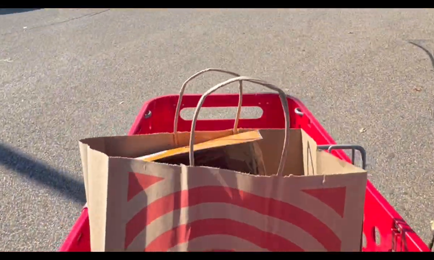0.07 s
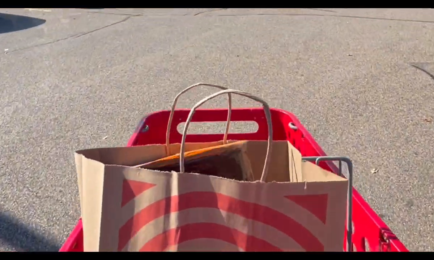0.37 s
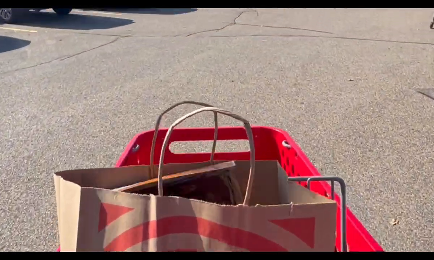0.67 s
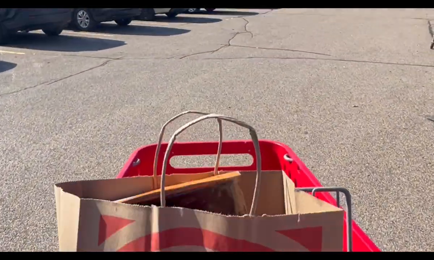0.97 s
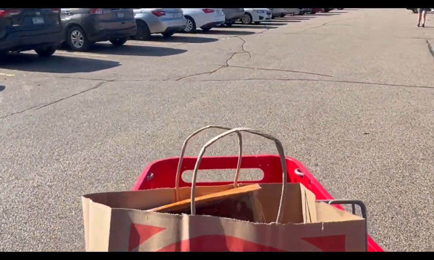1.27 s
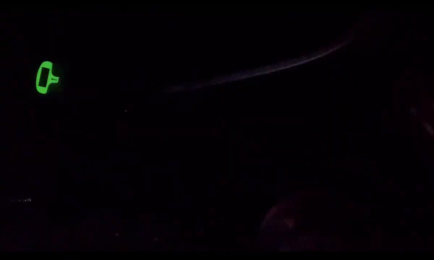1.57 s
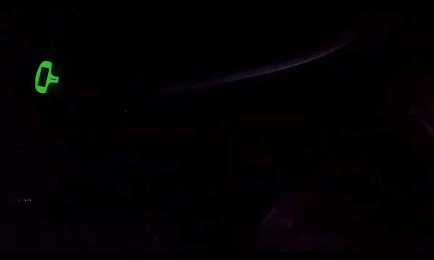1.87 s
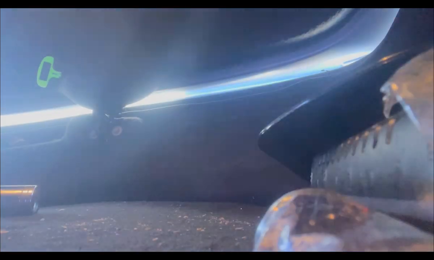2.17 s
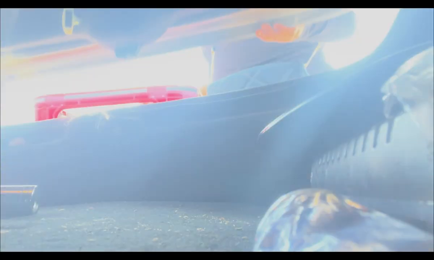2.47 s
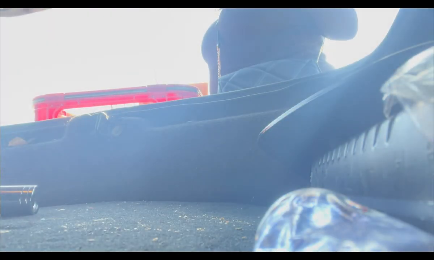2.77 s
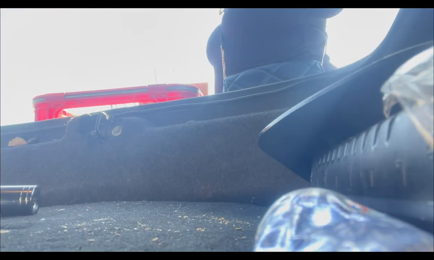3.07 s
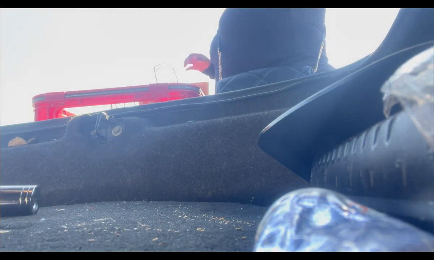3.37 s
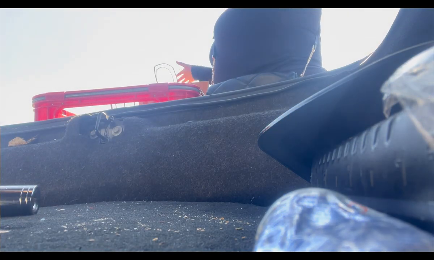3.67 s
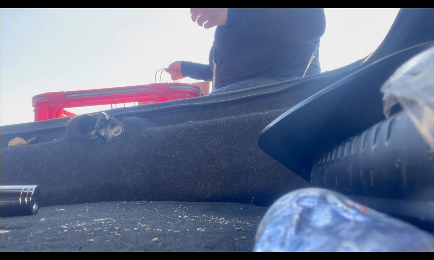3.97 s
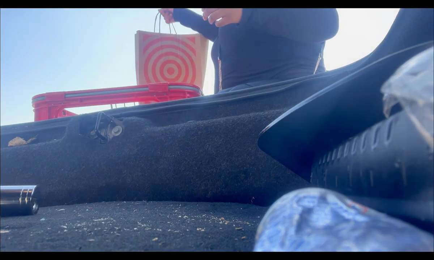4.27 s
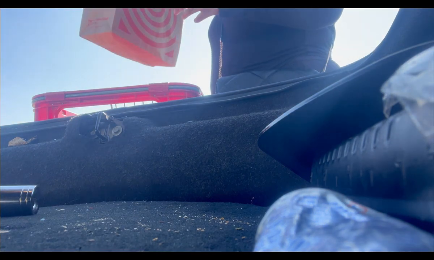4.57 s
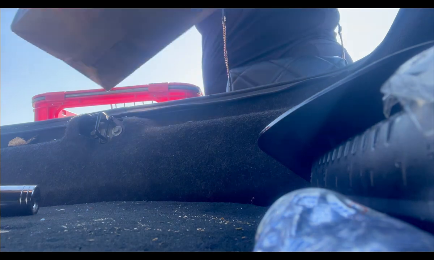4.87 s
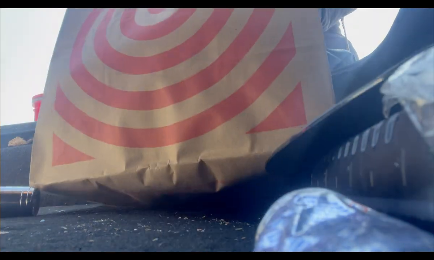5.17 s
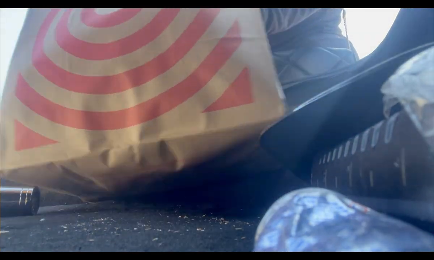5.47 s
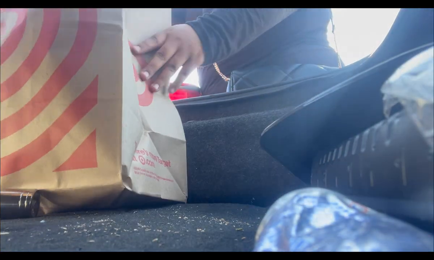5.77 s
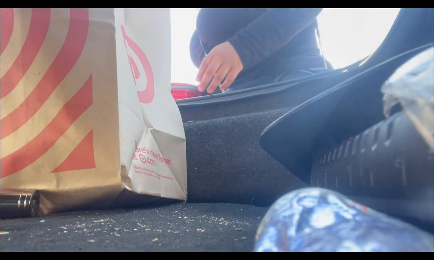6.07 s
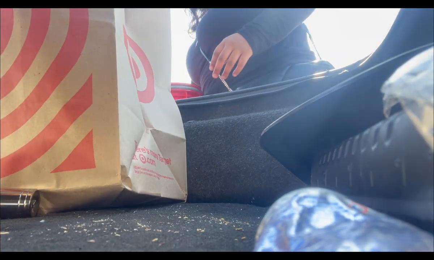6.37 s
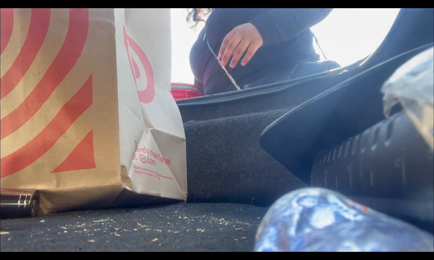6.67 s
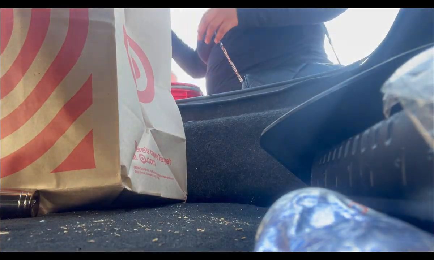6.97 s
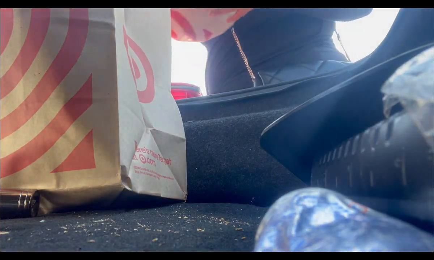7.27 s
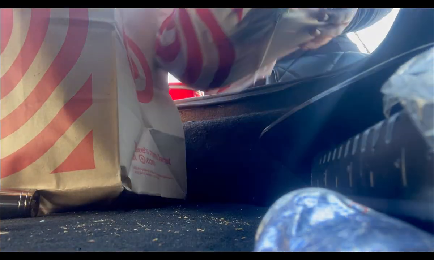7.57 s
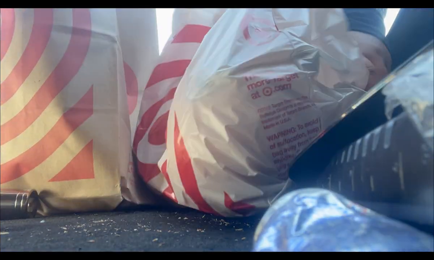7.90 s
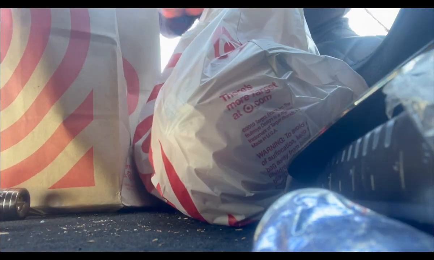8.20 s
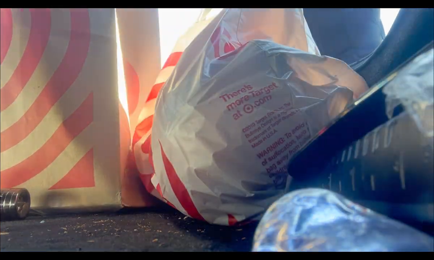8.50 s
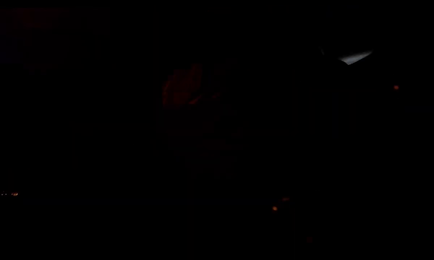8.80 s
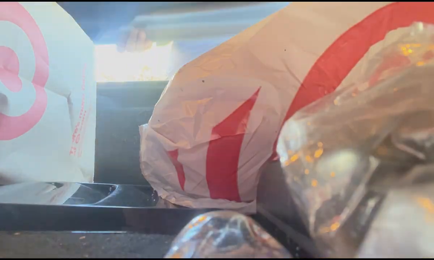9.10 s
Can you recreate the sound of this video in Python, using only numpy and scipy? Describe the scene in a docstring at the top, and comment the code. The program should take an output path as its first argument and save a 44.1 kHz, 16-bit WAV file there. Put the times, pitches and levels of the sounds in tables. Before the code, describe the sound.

A plastic shopping cart rattles close by over asphalt, wheels rumbling, basket clacking and steel fittings clinking, until an abrupt cut at 1.6 seconds. After near silence, heard from inside a car trunk, the latch clunks at 1.9 seconds and the lid springs open with a deep boom. Faint outdoor rumble and distant traffic come in. A tiny squeak at 2.6 seconds precedes a soft engine drone that fades by about 3.6. A paper bag rustles lightly at 4 seconds, its handle creaking, then crackles, knocks and thumps down close from 5 to 6. A thin plastic bag crinkles faintly from 6.5 seconds, growing loud and landing around 7.8 with thumps and clicks of hard goods. Small crinkles follow. At 8.8 seconds the lid slams with a heavy boom, the loudest sound. The last moment cuts to quiet rumble and thin hiss inside the car.

```python
"""A parking lot, in three scenes joined by hard cuts. First a plastic shopping cart rattles over asphalt:
wheels rumble, the basket clacks, steel fittings click. Then, from inside a car's trunk, the latch lets
go and the lid springs open on far traffic; a paper bag and a plastic bag rustle in and thump down, and
the lid slams. Last comes a moment in the quiet car. Blows are noise bursts and damped modes; rolling
and rustling are noise broken into tiny grains."""
import sys
import numpy as np
from scipy import signal
from scipy.fft import rfft, irfft, next_fast_len
from scipy.io import wavfile
from scipy.ndimage import uniform_filter1d, map_coordinates

SR = 44100
rng = np.random.default_rng(int(sys.argv[2]) if len(sys.argv) > 2 else 0)


def master_out(mix):
    """Clip the mix to full scale and print it as 16-bit PCM to the path in sys.argv[1]."""
    frames = np.transpose(np.atleast_2d(mix))
    ceiling = np.clip(frames, -1, 1)
    pcm = np.round(ceiling * 32767).astype(np.int16)
    wavfile.write(sys.argv[1], SR, pcm)


N = 411894
T = np.arange(N) / SR
CART_ENDS, TRUNK_STARTS, TRUNK_ENDS, CAR_STARTS = 1.573, 1.623, 9.035, 9.059  # seconds


# EQ of the wheels and the basket. Each row: frequency in Hz, level in dB.
WHEEL_EQ = [(12, -45), (20, -26), (47, -2.5), (75, 0.5), (103, -1), (230, -13), (250, -11.5), (320, -30),
            (550, -120)]
BASKET_EQ = [(110, -29), (180, 3), (232, -9.5), (274, -4.5), (313, 2.5), (428, 1.5), (472, -2.5), (538, 1),
             (685, -8.5), (831, -5.5), (1080, -2.5), (1390, -9), (1700, -8), (2200, -16), (3200, -20),
             (4160, -36), (7040, -120)]
# Gritty crunch, with a narrow filter dip near 10 kHz. Each row: frequency in Hz, level in dB.
NOTCHED_CRUNCH_EQ = [(1470, -24), (2500, -5.5), (4020, 0.5), (6500, -2.5), (9220, -2.5), (10200, -24),
                     (11600, -7.5), (13700, -30), (16000, -12.5)]
# Crunches over loose grit. Each row: start in seconds, hold in seconds, level in dB.
CRUNCHES = [(0.043, 0.006, -46), (0.946, 0.014, -43.5), (1.412, 0.032, -40.5)]

def rolling(shake_db):
    """Hard wheels rumble on coarse asphalt, rattle the basket and crunch grit, all riding the shake."""
    wheel_gain = amp(-35.5 + 0.36 * shake_db + 0.61 * wobble(18))
    wheels = wheel_gain * noise(WHEEL_EQ, grains(rate=690, spread_db=2.5, life=0.026))
    rattle = noise(BASKET_EQ, grains(rate=370, spread_db=4, life=0.021))
    rattle = amp(-38.5 + 0.71 * shake_db) * patchy(rattle, depth_db=1.5, bands=4, frames=8)
    crunch, = swells(CRUNCHES, attack=.05, release=.1)
    grit = noise(NOTCHED_CRUNCH_EQ, grains(rate=3200, spread_db=5.5, life=0.0026))
    return wheels + rattle + (amp(-55.5 + 0.7 * shake_db) + crunch) * grit


# Bumps in the asphalt. Each row: start in seconds, relative level in dB, pitch in Hz.
JOLTS = [(0.061, -15.5, 1900), (0.099, -25, 2000), (0.229, -21.5, 1500), (0.462, -20.5, 2200),
         (0.482, -21, 2000), (0.546, -24, 1800), (0.573, -23.5, 1490), (0.61, -24, 2500),
         (.780, -23.5, 1900), (0.8109, -23.5, 2500), (0.83, -22.5, 1513), (0.9833, -17, 1500),
         (1.0272, -21, 1600), (1.0634, -15, 1396), (1.128, -33, 1500), (1.437, -20, 1700),
         (1.496, -19, 1300)]
# EQ of a plastic clack. Each row: frequency in Hz, level in dB.
CLACK_EQ = [(200, -28), (500, -6), (1100, 0.5), (1700, -5), (2800, -5.5), (5000, -9), (9000, -24.5)]
# Ring of the basket's walls. Each row: frequency in Hz, level in dB, decay time in seconds.
BASKET_MODES = [(281.5, -2.5, 0.31), (418, -7.5, 0.096), (527.5, -2.5, 0.053), (897, 0, 0.1),
                (1066, 1, 0.067), (1240, -1, 0.046), (1462, -4, 0.064), (1960, -3.5, 0.05),
                (2194, 0.5, 0.036), (2770, -16.5, 0.097)]

def basket_clacks():
    """Each bump makes the plastic basket clack and sets its walls ringing."""
    out = np.zeros((2, N))
    for s, db, hz in JOLTS:
        clack = burst(centred(CLACK_EQ, hz, slope_db=6), t60=0.057, attack=0.0012)
        add(out, s, amp(db - 13.5) * clack + amp(db - 18) * clang(BASKET_MODES))
    return out


def chatter(shake_db, count):
    """Extra rows for CLINKS: faint clicks at random times, louder where the cart shakes harder."""
    place, size, ring_size, pitch = rng.random((count, 4)).T
    s = (np.arange(count) + place) * CART_ENDS / count
    push_db = np.interp(s, T, shake_db)
    click_db = -34.5 + push_db + 5.5 * (2 * size - 1)
    ring_db = -40.5 + push_db + 5.5 * (2 * ring_size - 1)
    return list(zip(s, click_db, ring_db, 4800 + 1800 * pitch))


# Steel clinks. Each row: start in seconds, relative click level in dB, ring level in dB, ring pitch in Hz.
CLINKS = [(0.0295, -31.5, -32, 6400), (0.041, -28.5, -34.5, 5100), (0.1591, -30, -49, 5100),
          (0.3527, -27, -35.5, 5100), (0.391, -33, -39, 5000), (0.410, -32.5, -39, 5000),
          (0.4404, -33, -38.5, 6500), (0.4838, -25, -29.5, 5000), (0.493, -35, -31.5, 5000),
          (0.5746, -27.5, -47.5, 5000), (0.604, -28.5, -38.5, 5800), (0.635, -33.5, -30.5, 5900),
          (0.7138, -36.5, -41, 5000), (0.7799, -29, -44, 5000), (0.8104, -28.5, -25.5, 6400),
          (0.8594, -32.5, -36.5, 5300), (0.9214, -26, -34, 5000), (0.945, -23.5, -31, 5300),
          (0.9821, -26, -31, 5800), (1.0106, -34.5, -35, 5100), (1.0267, -25.5, -34.5, 5300),
          (1.059, -29.5, -32, 6500), (1.0874, -33, -30, 5800), (1.1046, -28.5, -21.5, 6400),
          (1.119, -35.5, -34.5, 6400), (1.138, -26.5, -27.5, 5800), (1.2309, -28, -33.5, 6500),
          (1.3183, -26.5, -25.5, 6500), (1.3492, -30, -28.5, 5800), (1.4099, -25.5, -38, 8000),
          (1.4503, -24.5, -20.5, 6500), (1.4851, -32.5, -26.5, 6400), (1.517, -32, -28, 5000),
          (1.5628, -35.5, -39, 5600)]
# Bright click, with a narrow filter dip near 10 kHz. Each row: frequency in Hz, level in dB.
NOTCHED_CLICK_EQ = [(800, -15.5), (2000, 3), (3500, 8), (6000, 6), (9000, 1), (10300, -13.5), (11800, 1),
                    (14000, -23), (16000, -23)]
# EQ of the steel ring. Each row: frequency in Hz, level in dB.
STEEL_EQ = [(3500, -23), (4400, 1), (5050, 3.5), (5400, -6.5), (5800, -3.5), (6100, -5), (6480, 8.5),
            (7000, -2), (7900, -1), (8600, -17), (12000, -38)]

def steel_fittings(shake_db):
    """Steel fittings click against the plastic walls; the struck wire rings at its own pitch."""
    out = np.zeros((2, N))
    for s, db, ring_db, ring_hz in CLINKS + chatter(shake_db, count=18):
        tick_hz = 3100 * 2 ** rng.normal(0, 1)  # scattered by about an octave
        tick = burst(centred(NOTCHED_CLICK_EQ, tick_hz, slope_db=1.5), t60=0.03, attack=0.00027)
        wire = burst(centred(STEEL_EQ, ring_hz, slope_db=20.5), t60=0.0093, attack=0.00034)
        add(out, s, amp(db - 6) * tick + amp(ring_db) * wire + amp(db - 16) * clang(BASKET_MODES))
    return out


# How hard the asphalt shakes the cart. Each row: time in seconds, level in dB.
SHAKE = [(0.0, -35), (0.078, -40.5), (0.126, -43.5), (0.266, -38.5), (0.376, -42), (0.48, -33.5),
         (0.76, -44), (0.786, -36.5), (0.805, -36.5), (0.83, -32), (0.9, -39), (0.95, -34.5), (1.02, -37.5),
         (1.07, -27), (1.084, -31), (1.316, -40), (1.508, -30), (1.57, -37.5)]
USUAL_SHAKE_DB = -37
# Stereo width outdoors. Each row: frequency in Hz, side level against mid in dB.
OPEN_AIR_WIDTH = [(60, -19), (110, -14.5), (200, -16), (380, -16), (700, -6.5), (1290, -5.5), (2380, -4),
                  (4400, -4), (8120, -5), (15000, 5)]

def cart():
    """The asphalt shakes the whole cart, and hard surfaces close by reflect its treble."""
    shake_db = curves(SHAKE)[0] - USUAL_SHAKE_DB
    out = rolling(shake_db) + basket_clacks() + steel_fittings(shake_db)
    return stereo(near_walls(out, echo_db=-10, reach=0.0043, lowest_hz=1780), OPEN_AIR_WIDTH)


# Hits of lid, latch and seal. Each row: start in seconds, relative thud and knock levels in dB,
# crack level in dB, crack pitch in Hz, crack decay time in seconds.
LID_HITS = [(1.873, -42, -22, -45, 1600, .022), (1.907, -22, -28, -36.5, 2010, 0.12),
            (1.927, -29.5, -28.5, -34, 4370, 0.11), (1.938, -32, -32.5, -39, 4560, 0.041),
            (1.953, -23.5, -28.5, -41, 3800, 0.037), (1.995, -21, -32, -50, 4500, 0.044),
            (2.073, -28, -36, -55.5, 1700, 0.043), (2.32, -62, -48, -53, 4000, 0.021),
            (8.8195, -6, -17, -29, 2350, 0.022), (8.823, -11, -9, -15, 2100, 0.027),
            (8.832, -13.5, -14, -17, 1910, 0.024), (8.848, -0.5, -19.5, -25, 4040, 0.016),
            (8.863, -11.5, -17.5, -37, 4980, 0.055), (8.877, -12, -29, -37, 5500, 0.1),
            (8.891, -13, -19, -26, 6630, 0.078), (8.937, -19.5, -30.5, -38, 6040, 0.094),
            (8.99, -36, -55, -53.5, 4000, 0.092)]
# EQ of the low, mid and top layers of a hit, on lid or bag. Each row: frequency in Hz, level in dB.
THUD_EQ = [(30, -20), (90, 6), (250, -4), (420, -1), (600, -13.5), (1500, -59)]
KNOCK_EQ = [(150, -28.5), (400, 8.5), (900, 1.5), (1800, -7), (2600, -22), (5000, -60)]
CRACK_EQ = [(1000, 5.5), (2500, 0.5), (5500, -4), (9000, -6.5), (11500, -18), (13000, -45.5), (16000, -35)]
# Ring of the lid's panels. Each row: frequency in Hz, level in dB, decay time in seconds.
PANEL_MODES = [(569, 0, 0.12), (614, 4.5, 0.2), (715, 3, 0.22), (789, -1.5, 0.14), (883, 3.5, 0.075),
               (970, 7.5, 0.097), (1045, 4, 0.075), (1330, -13.5, 0.07), (1630, -2, 0.049),
               (1690, -12, 0.051), (2680, -15, .07)]

def lid_hits():
    """The lid knocks free, then later slams and rebounds on its seal; each contact rings its panels."""
    out = np.zeros((2, N))
    for s, thud_db, knock_db, crack_db, crack_hz, t60 in LID_HITS:
        add(out, s, amp(thud_db - 3) * burst(THUD_EQ, t60 * 3.1, attack=0.0028))
        add(out, s, amp(knock_db - 7) * burst(KNOCK_EQ, t60 * 2.13))
        crack = burst(centred(CRACK_EQ, crack_hz, slope_db=5.5), t60, attack=0.00038)
        add(out, s, amp(crack_db) * crack + amp(knock_db - 17.5) * clang(PANEL_MODES))
    return out


# Rubs of the latch and, last, of the seal. Each row: centre in seconds, level in dB, width in seconds.
LATCH_AND_SEAL_RUBS = [(1.868, -32.5, 0.011), (1.876, -24.5, 0.0044), (1.892, -31.5, 0.023),
                       (2.001, -36.5, 0.0054), (2.088, -49, 0.019), (8.818, -19.5, 0.0078)]

def latch_and_seal():
    """The latch rubs as it opens; the lid brushes its seal at the slam."""
    eq = [(150, -5), (400, -2), (560, -1), (640, -2.5), (740, 0), (1000, -5.5), (1300, -16.5),
          (1660, -21.5), (2100, -28), (3000, -27.5), (8000, -38), (13000, -58.5)]
    return rub(LATCH_AND_SEAL_RUBS, eq)


# Booms of the opening and of the slam. Each row: start in seconds, level in dB, attack in seconds.
OPEN_BOOMS = [(1.912, -8, 0.013), (1.990, -3.5, 0.0039)]
SLAM_BOOMS = [(8.817, -1.5, 0.0095), (8.858, -6, 0.011)]
# Ring of the latch, the free lid, the shut lid and the car's body.
# Each row: frequency in Hz, level in dB, decay time in seconds.
LATCH_MODES = [(179, 0.5, 0.07), (266.4, -3, 0.28), (563, -12, 0.08), (728, -11.5, 0.14)]
FREE_LID_MODES = [(45.4, -4, 0.19), (81.7, -1.5, 0.31), (93.9, -8, 0.4), (124.6, -9, 0.25),
                  (141, -14, 0.34)]
SHUT_LID_MODES = [(49.2, 2, 0.16), (72, -1, 0.31), (110.5, -7.5, 1), (139.2, -7.5, 0.32),
                  (231.7, -16.5, 0.54), (281.3, -11, 0.2)]
BODY_MODES = [(304, -39, 0.3), (381.5, -9.5, 0.31), (428, -22, .4), (497, -30, 0.26), (706, -27, 0.37)]

def lid_booms():
    """The latch rings and the lid booms on its hinges; slammed, it booms on the body, which rings on."""
    out = np.zeros(N)
    add(out, 1.926, amp(-11.5) * ring(LATCH_MODES, attack=0.00063))
    for booms, modes in (OPEN_BOOMS, FREE_LID_MODES), (SLAM_BOOMS, SHUT_LID_MODES):
        for s, db, attack in booms:
            add(out, s, amp(db) * ring(modes, attack))
    add(out, 8.872, ring(BODY_MODES, attack=0.005))
    return out


def air_squeeze(contact_s=8.815, hz=44.6, rise_db_per_s=598):
    """The falling lid squeezes the trunk's air: a sub tone that shoots up and stops at contact."""
    envelope = amp(-7.5 + rise_db_per_s * np.minimum(T - contact_s, 0)) * during(0, contact_s)
    return envelope * np.sin(2 * np.pi * hz * (T - contact_s))


def rustle(moves, flex_eq, crinkle_eq, rate, spread_db, pop_db):
    """A moving bag buckles in soft flaps, bright grains and sparse pops; its colour shifts as it folds."""
    flex_gain, crinkle_gain = swells(moves, attack=0.094, release=.16)
    flaps = noise(flex_eq, grains(rate=320, spread_db=0.9, life=0.0088))
    fizz = amp(0.5 * wobble(46)) * noise(crinkle_eq, grains(rate, spread_db, life=0.0081))
    pops = amp(pop_db) * noise(crinkle_eq, grains(rate=51, spread_db=0.5, life=0.0027))
    flaps = patchy(flaps, depth_db=2.5, bands=5, frames=6)
    crackle = patchy(fizz + pops, depth_db=2.7, bands=16, frames=6)
    return flex_gain * flaps + crinkle_gain * crackle


# Paper bag moves. Each row: start in seconds, hold in seconds, flex level in dB, crinkle level in dB.
PAPER_MOVES = [(3.22, 0.015, -61, -76), (3.975, 0.016, -43.5, -58.5), (4.07, 0.006, -38.5, -61.5),
               (4.4, 0.25, -62.5, -76.5), (4.655, 0.0062, -57, -64.5), (4.955, 0.023, -40.5, -57),
               (4.99, 0.41, -47.5, -58.5), (5.085, .035, -31, -48.5), (5.13, .05, -38.5, -65),
               (5.19, 0.018, -29.5, -43), (5.26, 0.1, -34.5, -51.5), (5.345, .015, -38.5, -44.5),
               (5.39, .05, -40, -47.5), (5.46, 0.28, -47.5, -52), (5.665, 0.038, -31, -47.5),
               (5.735, 0.054, -37, -54), (5.795, .035, -36.5, -52.5)]
# EQ of paper flexing and crinkling. Each row: frequency in Hz, level in dB.
PAPER_FLEX_EQ = [(94, -16.5), (160, 3.5), (281, -5), (397, 0), (902, -7.5), (1230, -11.5), (1640, -14),
                 (1810, -16), (2150, -23.5), (3000, -24), (3900, -28.5), (6600, -120)]
PAPER_CRINKLE_EQ = [(1200, -6), (2200, -2.5), (4000, -3), (6000, -4.5), (7500, -10.5), (9700, -9),
                    (11500, -21), (13500, -33), (16000, -22)]
# Scuffs by the cart and handle creaks. Each row: centre in seconds, level in dB, width in seconds.
SCUFFS = [(3.228, -58, 0.017), (3.57, -49.5, 0.0046), (4.26, -58, 0.0088)]
HANDLE_CREAKS = [(4.032, -42.5, 0.017), (4.07, -40, 0.017)]

def paper_bag():
    """Paper rustles out of the cart among faint scuffs; the handle creaks as it takes the weight."""
    paper = rustle(PAPER_MOVES, PAPER_FLEX_EQ, PAPER_CRINKLE_EQ, rate=620, spread_db=-2, pop_db=-11.5)
    creak_eq = [(250, -49), (410, -9), (480, 0.5), (560, -12.5), (900, -21), (3000, -61)]
    return paper + rub(SCUFFS, KNOCK_EQ) + rub(HANDLE_CREAKS, creak_eq)


# Plastic bag moves. Each row: start in seconds, hold in seconds, flex level in dB, crinkle level in dB.
PLASTIC_MOVES = [(6.23, 0.18, -72, -67), (6.45, 0.62, -69, -67), (6.65, 0.055, -51.5, -53),
                 (6.99, 0.044, -73, -70), (7.12, 0.15, -62.5, -64.5), (7.26, 0.37, -59, -55),
                 (7.305, 0.04, -46.5, -45.5), (7.555, 0.022, -32.5, -43), (7.6, 0.2, -41.5, -46),
                 (7.665, 0.026, -33, -46.5), (7.7, 0.051, -28.5, -40), (7.79, 0.067, -28, -36.5),
                 (7.9, 0.2, -44.5, -42.5), (8.02, 0.011, -46, -54.5), (8.12, 0.09, -63, -57.5),
                 (8.25, .22, -73, -76), (8.49, 0.36, -53, -69.5)]
# EQ of plastic flexing and crinkling. Each row: frequency in Hz, level in dB.
PLASTIC_FLEX_EQ = [(94, -46), (160, -1), (346, -2), (437, 4.5), (526, -11), (573, -0.5), (664, -5.5),
                   (1340, -9.5), (1850, -16.5), (2400, -21), (3000, -17.5), (3900, -28.5), (6600, -120)]
PLASTIC_CRINKLE_EQ = [(1000, -7), (1800, -4.5), (2700, -8), (4500, 0), (6000, -0.5), (7500, -3.5),
                      (9300, -3.5), (11500, -10.5), (13500, -28.5), (15500, -16)]
# Crease flicks. Each row: start in seconds, relative level in dB, decay time in seconds.
CREASES = [(6.544, -56, .04), (6.584, -47, .04), (6.646, -43.5, .04), (6.766, -49.5, 0.054),
           (7.009, -44.5, .04), (7.099, -53.5, .04), (7.1362, -46, .04), (7.209, -45, .04),
           (7.257, -38.5, .04), (7.298, -29, .05), (7.4828, -35.5, .04), (7.693, -37, .04),
           (7.7794, -22.5, 0.044), (7.901, -26, .04), (7.952, -36.5, 0.033), (8.1446, -36.5, 0.047),
           (8.184, -38, .03), (8.2627, -46.5, .035), (8.2886, -46.5, 0.034), (8.3445, -43, .008),
           (8.415, -48, 0.023), (8.4947, -46.5, .06), (8.545, -57, .03), (8.61, -53, .04),
           (8.6348, -44, 0.066), (8.6892, -46.5, .05), (8.711, -48.5, .05), (8.7805, -41, .04)]

def plastic_bag():
    """Thin plastic rustles in a dense fizz, with single creases flicking on top."""
    out = rustle(PLASTIC_MOVES, PLASTIC_FLEX_EQ, PLASTIC_CRINKLE_EQ, rate=1400, spread_db=1.8, pop_db=-12)
    for s, db, t60 in CREASES:
        add(out, s, amp(db - 7) * burst(PLASTIC_CRINKLE_EQ, t60, attack=0.00057))
    return out


# Bag hits, and first a knock of the cart. Each row: start in seconds, relative knock and thud levels in dB, #
# crack level in dB, crack pitch in Hz, crack decay time in seconds.
BAG_HITS = [(3.372, -26.5, -21.5, -51.5, 2320, 0.027), (3.824, -33, -40.5, -62.5, 2600, .03),
            (4.068, -19, -37, -45.5, 2900, .04), (4.152, -27.5, -32.5, -55.5, 2900, .035),
            (5.006, -26.5, -50, -36.5, 3500, 0.022), (5.075, -15.5, -22, -27, 2280, 0.048),
            (5.088, -17, -19, -48.5, 1800, .016), (5.182, -11, -20.5, -22.5, 3300, .011),
            (5.231, -13, -15.5, -36.5, 1700, .016), (5.2408, -5.5, -14, -17, 3800, 0.019),
            (5.285, -10, -26, -22.5, 4160, 0.02), (5.327, -9, -36, -17.5, 4030, 0.015),
            (5.376, -24.5, -19, -28.5, 5500, 0.011), (5.653, -10.5, -24, -33, 5500, 0.018),
            (5.677, -17, -37, -31, 1500, .016), (5.698, -15.5, -43, -26.5, 2290, 0.025),
            (5.709, -23, -27, -38, 8000, .016), (5.789, -34, -45, -34.5, 2400, .016),
            (6.158, -16.5, -23.5, -44.5, 1600, 0.023), (7.550, -11, -14.5, -35.5, 1900, .04),
            (7.573, -14, -20.5, -46.5, 1800, .03), (7.814, -19, -34, -28, 6500, 0.013),
            (7.8225, -3, -30, -19.5, 8500, .016), (7.8255, -5, -12, -11, 3020, .015),
            (7.833, -7.5, -12, -31.5, 1500, .03), (7.8604, -7, -16, -12.5, 5100, .011)]

def bag_hits():
    """The full bags bump and snap, after one knock of the cart; a soft contact, with little crack, has a duller
    knock too."""
    out = np.zeros((2, N))
    for s, knock_db, thud_db, crack_db, crack_hz, crack_t60 in BAG_HITS:
        dull_db_per_octave = 0.35 * max(knock_db - crack_db - 16, 0)
        knock_eq = [(hz, db - dull_db_per_octave * max(np.log2(hz / 1000), 0)) for hz, db in KNOCK_EQ]
        thud = amp(thud_db - 5) * burst(THUD_EQ, t60=0.09, attack=0.0017)
        knock = amp(knock_db - 8) * burst(knock_eq, t60=0.039, attack=0.0015)
        crack = amp(crack_db) * burst(centred(CRACK_EQ, crack_hz, slope_db=5.5), crack_t60, attack=0.00048)
        add(out, s, thud + knock + crack)
    return out


# Clicks of hard goods, bumps of a box and floor thumps. Each row: start in seconds, level in dB.
GOODS_CLICKS = [(5.242, -31.5), (5.2855, -32.5), (5.3269, -32), (7.825, -23.5), (7.8601, -10.5)]
BOX_BUMPS = [(7.554, -14), (7.829, -26)]
LANDINGS = [(5.246, -33), (5.645, -22), (5.709, -20), (6.12, -29), (7.199, -27.5), (7.747, -13),
            (7.811, -13.5), (7.863, -12.5), (8.446, -32), (8.486, -23)]
# Ring of the goods, box and trunk floor. Each row: frequency in Hz, level in dB, decay time in seconds.
GOODS_MODES = [(3890, -2.5, 0.019), (5264, 1, 0.012), (5230, -12.5, 0.011), (6300, -6, .012)]
BOX_MODES = [(255, 3.5, 0.047), (395, -1, .085), (505, -14.5, 0.072)]
FLOOR_MODES = [(56.3, 1, 0.12), (80.5, 1.1, 0.12), (119.5, 2, 0.1)]

def goods():
    """Hard goods click together, a hollow box bumps, and the load thumps softly on the carpeted floor."""
    out = np.zeros((2, N))
    mid = out[0]
    for s, db in GOODS_CLICKS:
        add(out, s, amp(db) * clang(GOODS_MODES))
    for s, db in BOX_BUMPS:
        add(mid, s, amp(db) * ring(BOX_MODES, attack=0.002))
    for s, db in LANDINGS:
        add(mid, s, amp(db) * ring(FLOOR_MODES, attack=0.009))
    return out


# Resonances of the trunk. Each row: frequency in Hz, bandwidth in Hz, level in dB.
TRUNK_RESONANCES = [(258.6, 13, -4.5), (320, 30, -6), (404, 23, -20.5), (498, 52, -7), (1400, 24, -18),
                    (1624, 180, -12.5), (1860, 200, -2), (2670, 40, -13), (6400, 600, -8), (8730, 890, -10)]
# Stereo width of close sounds in the trunk. Each row: frequency in Hz, side level against mid in dB.
CLOSE_WIDTH = [(60, -36), (250, -18.5), (500, -20.5), (1000, -2), (4000, -2.5), (8000, -5), (12000, 9.5)]

def trunk_hollow(pair):
    """The trunk adds its echoes and resonances; the low mids lean to the right."""
    pair = near_walls(pair, echo_db=-9, reach=.005, lowest_hz=1713)
    rings = sum(amp(db) * signal.lfilter(*signal.iirpeak(hz, hz / width, SR), pair)
                for hz, width, db in TRUNK_RESONANCES)
    left, right = stereo(pair + rings, CLOSE_WIDTH)
    left_eq = [(60, 0), (250, -1.5), (500, -2.5), (1200, -1.5), (4000, 1), (12000, 0.6)]
    return np.array([colour(left, left_eq), right])


# Engine swells. Each row: start in seconds, hold in seconds, level in dB.
ENGINE_SWELLS = [(2.71, 0.21, -38.5), (2.84, 0.31, -37), (3.2, 0.23, -41.5)]
# The engine's glide. Each row: time in seconds, pitch in Hz.
ENGINE_PITCH = [(2.68, 103), (2.86, 107.2), (3.08, 111.8), (3.2, 106.6), (3.35, 99.5)]
# Steadier tones around it. Each row: frequency in Hz, level against the gliding tone in dB.
ENGINE_TONES = [(130, -8.5), (178, -23), (237, -22.5)]

def engine():
    """An engine drones nearby; its pitch rises a little, then sinks."""
    envelope, = swells(ENGINE_SWELLS, attack=0.11, release=0.38)
    hum = tone(curves(ENGINE_PITCH)[0], drift_hz=3.7, rate=30)
    hum += sum(amp(db) * tone(hz, drift_hz=3.94, rate=25) for hz, db in ENGINE_TONES)
    return envelope * amp(1.3 * wobble(30)) * unit(hum)


# The squeak's bend. Each row: time in seconds, pitch in Hz.
SQUEAK_PITCH = [(2.56, 7300), (2.585, 6850), (2.61, 8060)]
# The scrape under it. Each row: centre in seconds, level in dB, width in seconds.
SCRAPE = [(2.592, -62, .022)]
# EQ of the scrape. Each row: frequency in Hz, level in dB.
SCRAPE_EQ = [(2800, -23), (3550, 1), (4300, -3), (5000, -5), (6000, -10), (7500, -17), (12000, -35)]

def squeak(centre_s=2.586, width_s=.018):
    """One faint, thin squeak dips and rises over a short scrape."""
    whistle = tone(curves(SQUEAK_PITCH)[0], drift_hz=150, rate=1000)
    out = rub(SCRAPE, SCRAPE_EQ)
    out[0] += amp(-57) * np.exp(-((T - centre_s) / width_s) ** 2) * whistle
    return out


# Swells of high hiss. Each row: start in seconds, hold in seconds, level in dB.
HISS_SWELLS = [(2.52, 0.4, -67), (3.22, 0.17, -69), (3.5, 0.71, -75.5)]
# EQ of the hiss. Each row: frequency in Hz, level in dB.
HISS_EQ = [(2000, -7.5), (3200, -13.5), (5500, -17), (8000, -8.5), (9000, -4.5), (11500, -7), (12300, -19),
           (13000, -25), (16000, -33.5)]

def high_hiss():
    """A thin, grainy hiss comes and goes in slow swells."""
    envelope, = swells(HISS_SWELLS, attack=0.91, release=0.54)
    flutter = amp(1.1 * wobble(12))
    hiss = noise(HISS_EQ, grains(rate=1400, spread_db=2, life=0.0092))
    return envelope * flutter * patchy(hiss, depth_db=4, bands=3, frames=24)


# EQ of the low rumble and of far traffic. Each row: frequency in Hz, level in dB.
RUMBLE_EQ = [(12, -27.5), (20, -5), (43, 4.5), (102, -0.5), (134, -2), (242, -20.5), (300, -20.5),
             (390, -55), (660, -120)]
TRAFFIC_EQ = [(120, -23), (250, 0.5), (500, -2.5), (1000, -9), (1500, -18), (2100, -23), (3000, -34),
              (6000, -39), (16000, -55.5)]
# Stereo width of the ambience from inside. Each row: frequency in Hz, side level against mid in dB.
AMBIENCE_WIDTH = [(60, -43), (250, -7), (500, -7), (1000, -1), (4000, 0.5), (8000, -3), (12000, 5)]

def parking_lot(lid_opens_s=2.1, lid_rise_s=0.019, lid_falls_s=8.2):
    """The outdoor bed: the lid lets in rumble and far traffic, which swell as it comes down."""
    shut = 1 - np.clip((T - lid_opens_s) / lid_rise_s, 0, 1)
    swell_db = 12.5 * np.maximum(T - lid_falls_s, 0)
    recede_db = 0.43 * (T - lid_opens_s)
    rumble = amp(-40.5 - recede_db - 7 * shut + swell_db + 1.2 * wobble(4.5)) * noise(RUMBLE_EQ)
    traffic_gain = amp(-57.5 - 20.5 * shut + swell_db + 0.38 * wobble(3))
    traffic = traffic_gain * patchy(noise(TRAFFIC_EQ), depth_db=2, bands=3, frames=22)
    out = rumble + traffic + high_hiss()
    out[0] += engine()  # mid only
    return stereo(out + squeak(), AMBIENCE_WIDTH)


# EQ of the hiss in the car. Each row: frequency in Hz, level in dB.
CAR_HISS_EQ = [(1500, -10.5), (2350, -0.5), (3200, -14), (4500, -10), (5600, -13), (6600, -4.5),
               (7600, -11.5), (8700, 0), (11500, -3), (12800, -17), (16000, -18.5)]

def quiet_car(rise_db_per_s=60):
    """Room tone of the car: rumble and thin hiss, with far traffic and a soft hum coming up."""
    hum = noise([(200, -19.5), (295, -20), (313, -1), (335, -20), (600, -23), (1200, -48)])
    hum *= swells([(9.18, 0.18, -52)], attack=.26, release=.3)[0]
    rumble = amp(-47) * noise(RUMBLE_EQ)
    traffic = amp(-55.5 + rise_db_per_s * (T - T[-1])) * noise(TRAFFIC_EQ)
    hiss = noise(CAR_HISS_EQ, grains(rate=560, spread_db=2, life=0.012))
    hiss = amp(-64.5) * patchy(hiss, depth_db=4, bands=4, frames=12)
    return stereo(rumble + traffic + hiss + hum, AMBIENCE_WIDTH)


def amp(db):
    """Decibels to gain."""
    return 10 ** (np.asarray(db) / 20)


def unit(x):
    """Scale to rms 1."""
    return x / np.sqrt(np.mean(x ** 2) + 1e-20)


def add(track, s, sound):
    """Mix a sound in at s seconds."""
    part = track[..., round(s * SR):][..., :sound.shape[-1]]
    part += sound[..., :part.shape[-1]]


def curves(rows):
    """Automation: one value per sample for each column after the time."""
    s, *columns = np.transpose(rows)
    return [np.interp(T, s, column) for column in columns]


def during(start, end):
    """A gate with 3 ms edges."""
    return np.clip(np.minimum(T - start, end - T) / .003 + 1, 0, 1)


def swells(rows, attack, release):
    """Envelopes from (start, hold, dB, ..) rows: up 60 dB in attack seconds, down 60 dB in release."""
    t = T[::64]
    start, hold, *levels = np.transpose(rows)[..., None]
    fade_db = -60 * (np.maximum(start - t, 0) / attack + np.maximum(t - start - hold, 0) / release)
    fade_db = np.maximum(fade_db, -200)
    return [np.interp(T, t, np.linalg.norm(amp(db + fade_db), axis=0)) for db in levels]


def wobble(rate):
    """A smooth random curve, rate knots a second."""
    return map_coordinates(rng.standard_normal(int(N * rate / SR) + 4), [T * rate])


def grains(rate, spread_db, life):
    """Envelope of rate tiny contacts a second: mostly small, a few large, each fading over life seconds."""
    contacts = rng.random(N) < rate / SR
    sizes = contacts * amp(spread_db * np.minimum(rng.exponential(size=N), 4))
    return np.sqrt(signal.lfilter([1], [1, -np.exp(-2 / (life * SR))], sizes ** 2))


def tone(hz, drift_hz, rate):
    """A sine whose pitch wanders by drift_hz, rate times a second."""
    return np.sin(2 * np.pi * np.cumsum(hz + drift_hz * wobble(rate)) / SR)


def noise(eq, envelope=1):
    """Mid and side noise of rms 1, shaped in time and then coloured."""
    return unit(colour(envelope * rng.standard_normal((2, N)), eq))


def rub(strokes, eq):
    """Friction: short bell-shaped swells of coloured noise."""
    return sum(amp(db) * np.exp(-((T - s) / width) ** 2) for s, db, width in strokes) * noise(eq)


def burst(eq, t60, attack=0.0022):
    """A blow on a damped body: dense coloured ringing that falls 60 dB in t60 seconds."""
    t = T[:SR // 4]
    fade = amp(-60 * t / max(t60, .004)) * (1 - np.exp(-(t / attack) ** 2))
    ringing = colour(fade * rng.standard_normal((2, len(fade))), eq)
    return ringing * np.linalg.norm(fade) / np.linalg.norm(ringing, axis=1, keepdims=True)


def ring(modes, attack):
    """Damped modes set going by a push that lasts attack seconds."""
    t = T[:SR // 2]
    waves = sum(amp(db - 60 * t / t60) * np.sin(2 * np.pi * hz * t) for hz, db, t60 in modes)
    return waves * (1 - np.exp(-t / attack))


def clang(modes):
    """Damped modes in mid and side, struck at new strengths and phases each time."""
    t = T[:SR // 4]
    hz, db, t60 = np.transpose(modes)[..., None]
    strength = amp(db + 2 * rng.standard_normal((2, len(modes), 1)))
    phase = rng.random((2, len(modes), 1))
    waves = strength * np.sin(2 * np.pi * (hz * t + phase)) * amp(-60 * t / t60)
    return waves.sum(axis=1) * (1 - np.exp(-t / 0.001))


def colour(x, eq):
    """Minimum-phase EQ through (Hz, dB) points."""
    n = x.shape[-1]
    size = 2 * next_fast_len(n // 2 + 4096)
    hz, db = np.transpose(eq)
    gain = amp(np.interp(np.log(np.fft.rfftfreq(size, 1 / SR) + 1), np.log(hz), db))
    cepstrum = irfft(np.log(gain))
    cepstrum[1:size // 2] *= 2
    cepstrum[size // 2 + 1:] = 0  # nothing rings ahead of a hit
    return irfft(rfft(x, size) * np.exp(rfft(cepstrum)), size)[..., :n]


def centred(eq, centre_hz, slope_db):
    """An EQ that loses a further slope_db per octave on both sides of a contact's own pitch."""
    grid = np.geomspace(100, 16000, 45)
    hz, db = np.transpose(eq)
    octaves_away = np.abs(np.log2(grid / centre_hz))
    return np.c_[grid, np.interp(np.log(grid), np.log(hz), db) - slope_db * octaves_away]


def patchy(pair, depth_db, bands, frames):
    """The colour drifts: patches of random gain, so many bands wide and frames long."""
    spectra = signal.stft(pair, nperseg=512)[2]
    patches = uniform_filter1d(rng.standard_normal(spectra.shape[1:]), bands, 0)
    patches = uniform_filter1d(patches, frames, 1)
    return unit(signal.istft(spectra * amp(depth_db * unit(patches)), nperseg=512)[1][:, :N])


def near_walls(pair, echo_db, reach, lowest_hz, count=12):
    """Small hard surfaces return weak copies within reach seconds; only short waves bounce."""
    walls = np.zeros(SR // 10)
    delays = reach * rng.uniform(.1, 1, count)
    walls[(delays * SR).astype(int)] = amp(echo_db) * rng.choice([-1, 1], count) / np.sqrt(count)
    walls = signal.lfilter(*signal.butter(2, lowest_hz, "high", fs=SR), walls)
    walls[0] = 1  # the direct sound
    return signal.fftconvolve(pair, walls[None], axes=1)[:, :N]


def stereo(pair, width):
    """Mid and side to left and right."""
    side = colour(pair[1], width)
    return np.array([pair[0] + side, pair[0] - side])


def scene():
    """Three moments in a row: the cart, the trunk, the quiet car."""
    lid = trunk_hollow(latch_and_seal() + lid_hits()) + lid_booms() + air_squeeze()
    bags = trunk_hollow(paper_bag() + plastic_bag() + bag_hits() + goods())
    trunk = (lid + bags + parking_lot()) * during(TRUNK_STARTS, TRUNK_ENDS)
    return cart() * during(0, CART_ENDS) + trunk + quiet_car() * during(CAR_STARTS, T[-1])


def record(dry, top_hz=16200):
    """The master leans slightly right, soft-clips near full scale and cuts everything above top_hz."""
    panned = dry * amp([[-.4], [.4]])
    clipped = panned / (1 + np.abs(panned / .95) ** 6) ** (1 / 6)
    return irfft(rfft(clipped) * (np.fft.rfftfreq(N, 1 / SR) < top_hz), N)


dry = scene()
out = record(dry)
master_out(out)
```